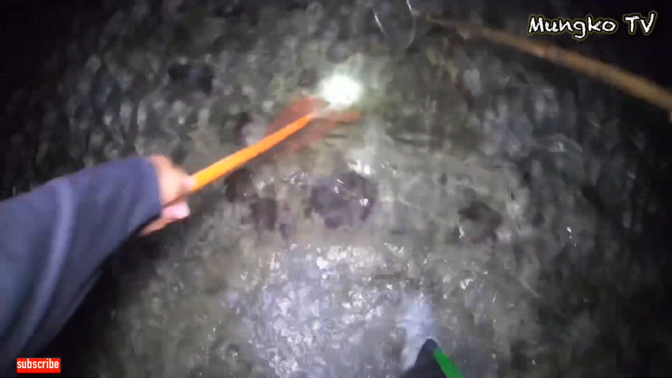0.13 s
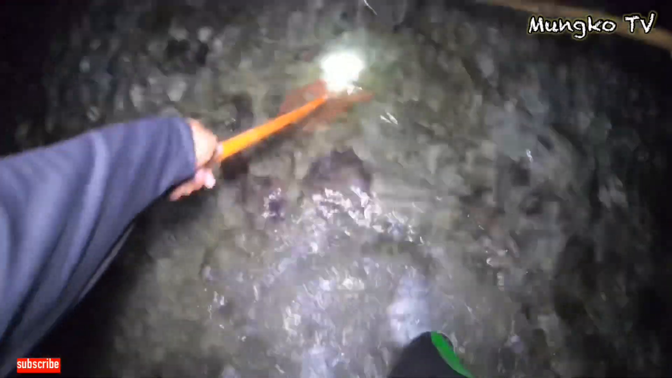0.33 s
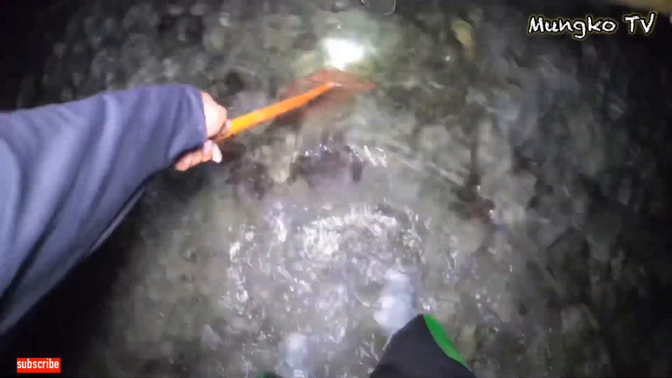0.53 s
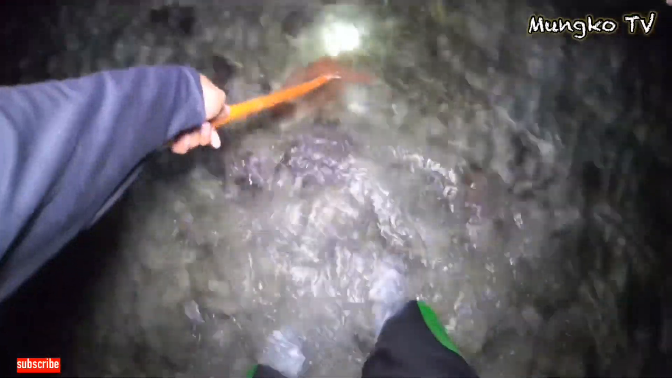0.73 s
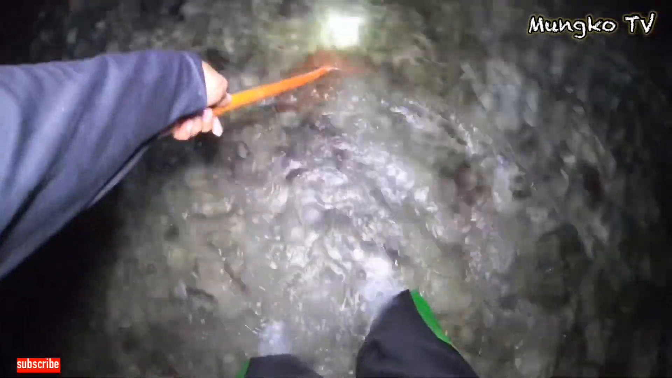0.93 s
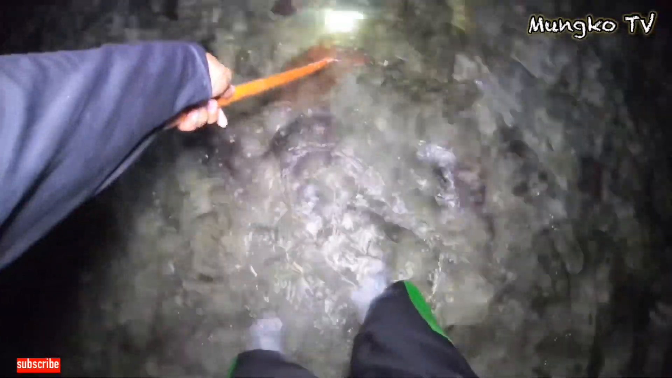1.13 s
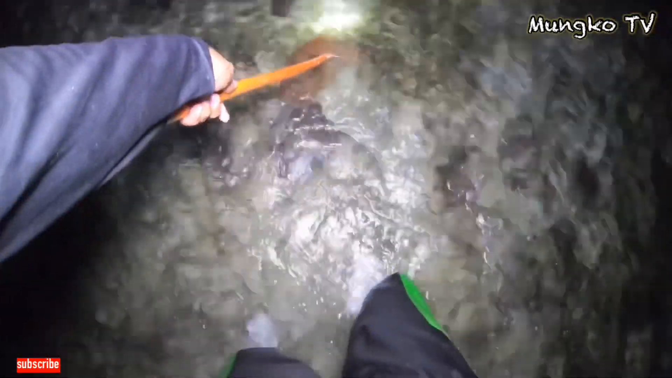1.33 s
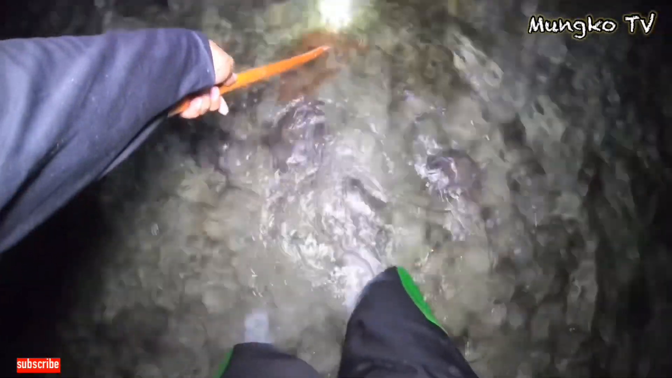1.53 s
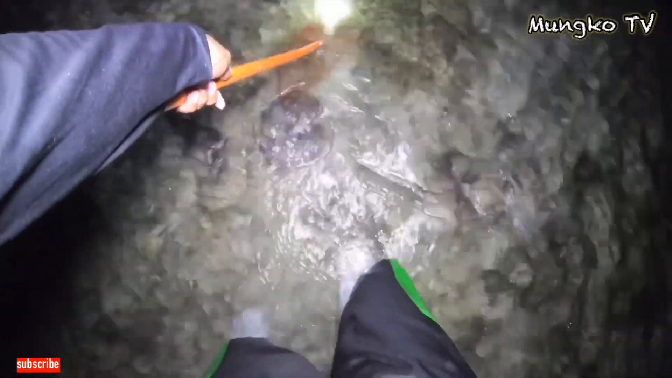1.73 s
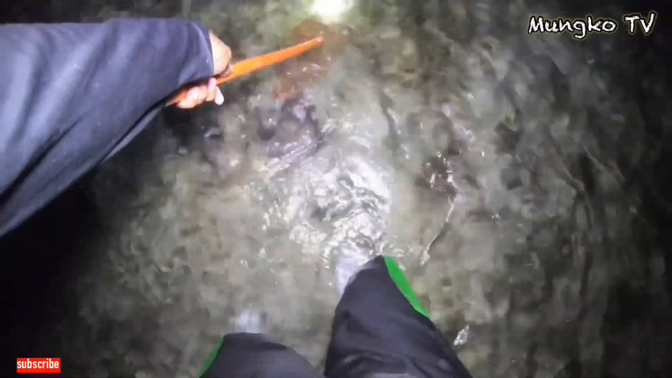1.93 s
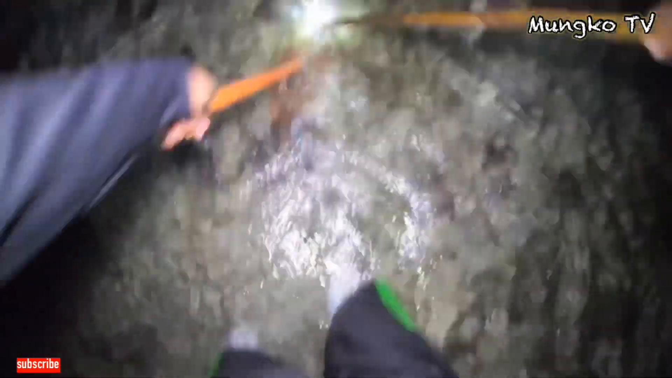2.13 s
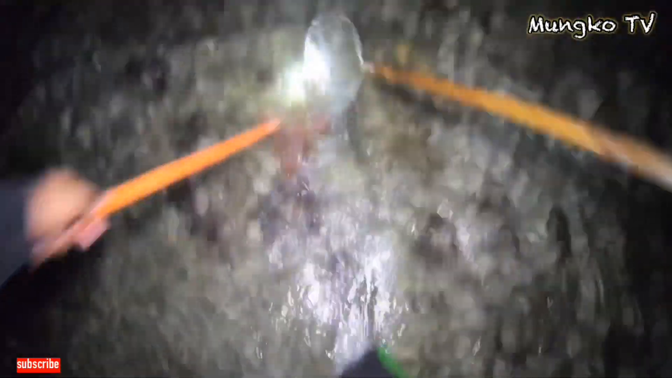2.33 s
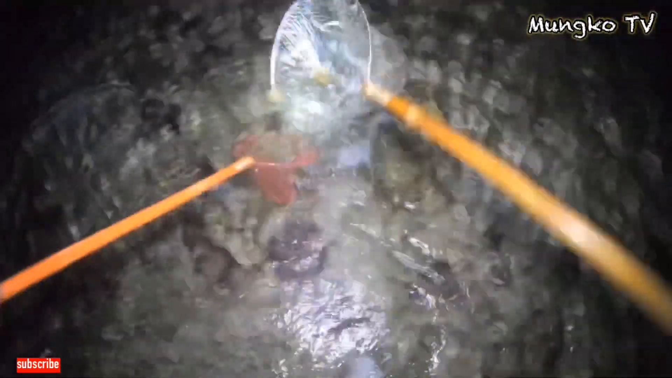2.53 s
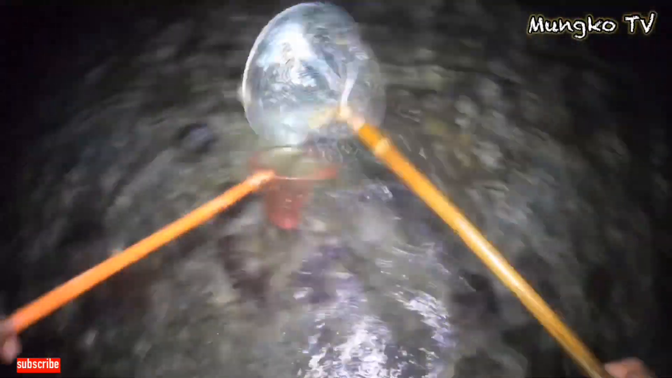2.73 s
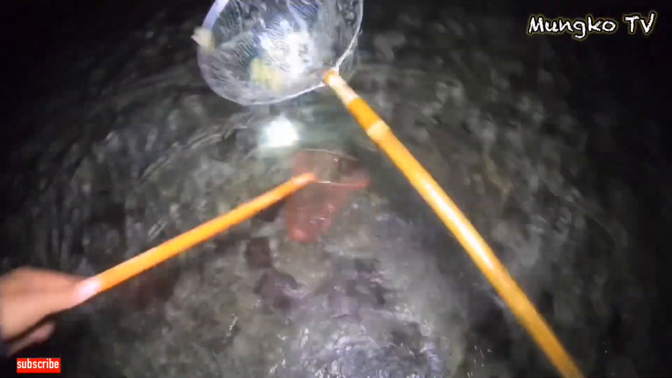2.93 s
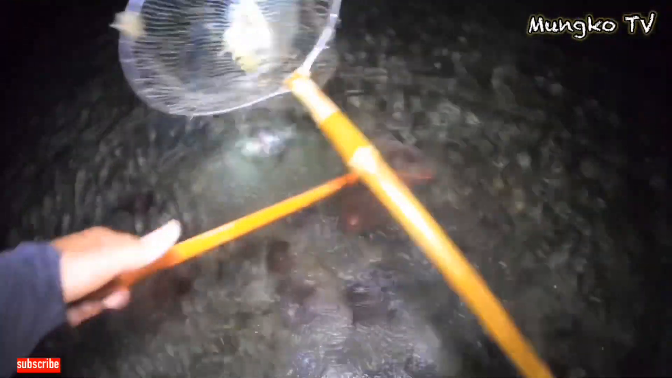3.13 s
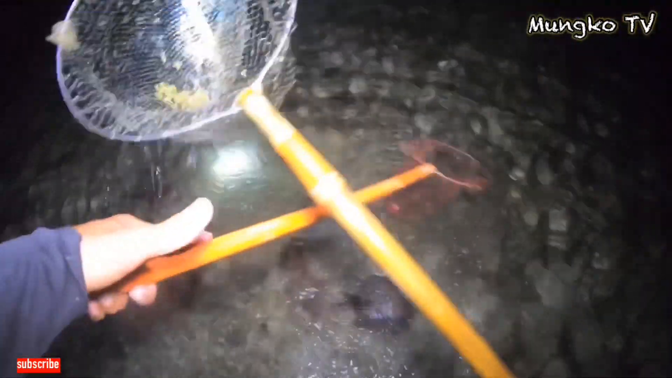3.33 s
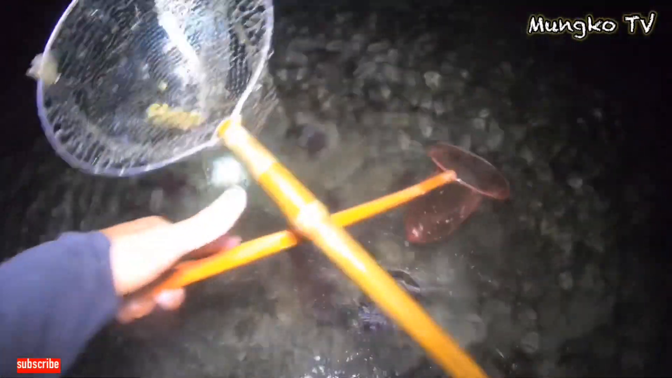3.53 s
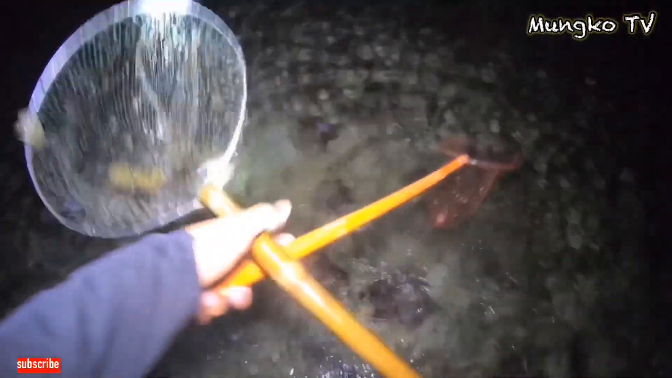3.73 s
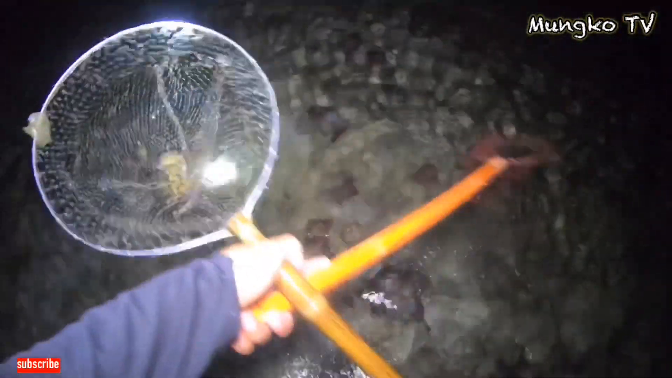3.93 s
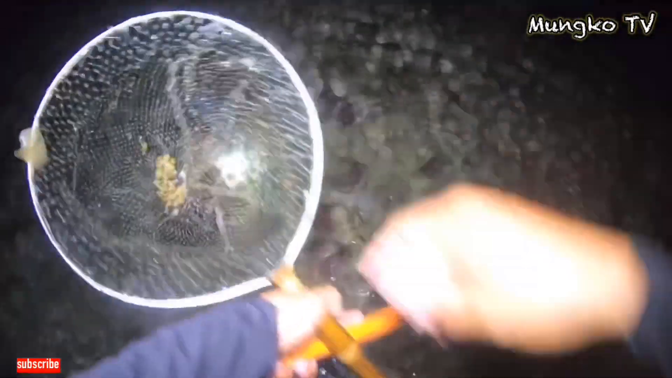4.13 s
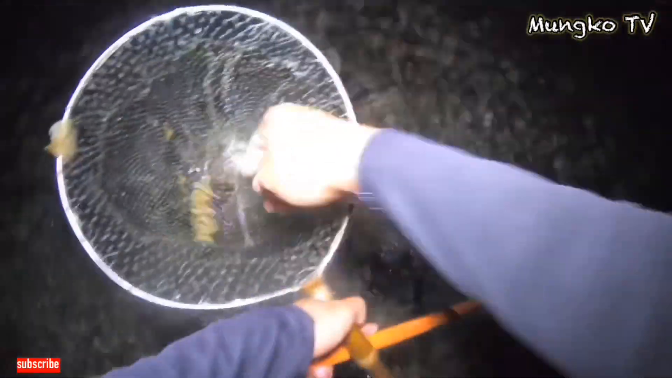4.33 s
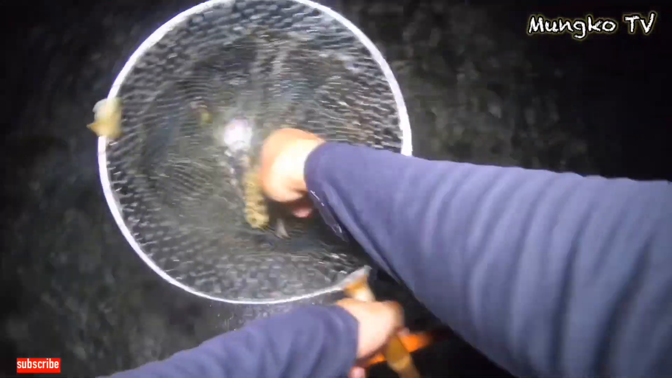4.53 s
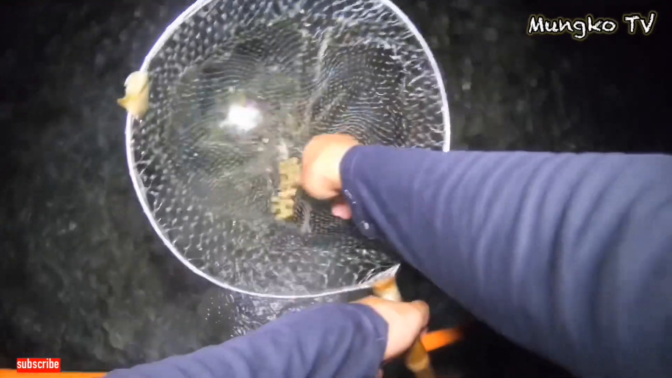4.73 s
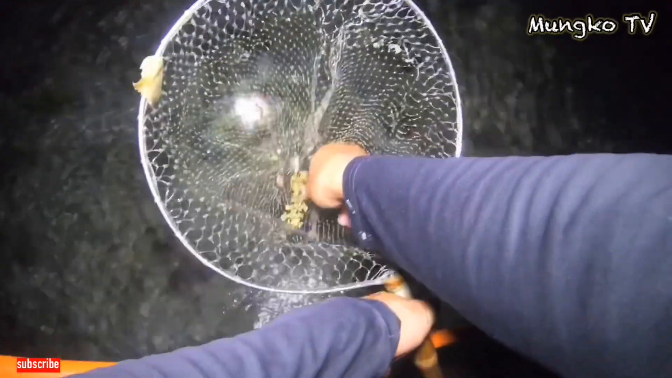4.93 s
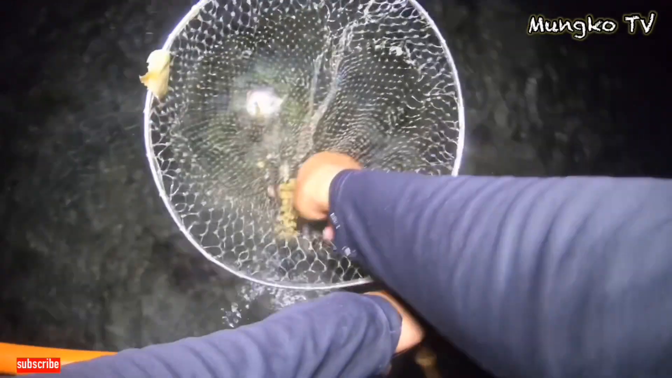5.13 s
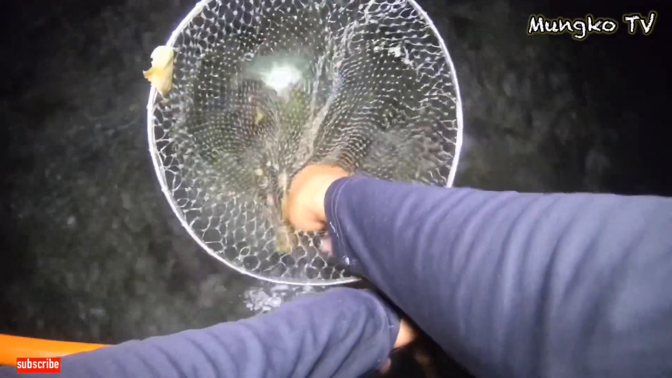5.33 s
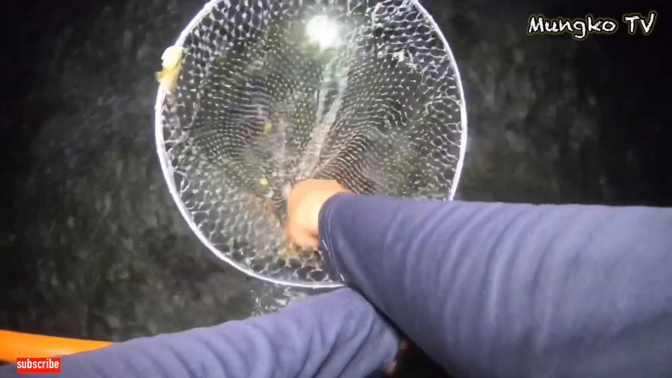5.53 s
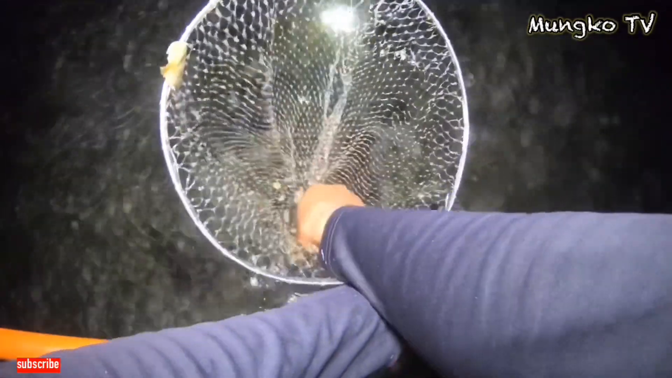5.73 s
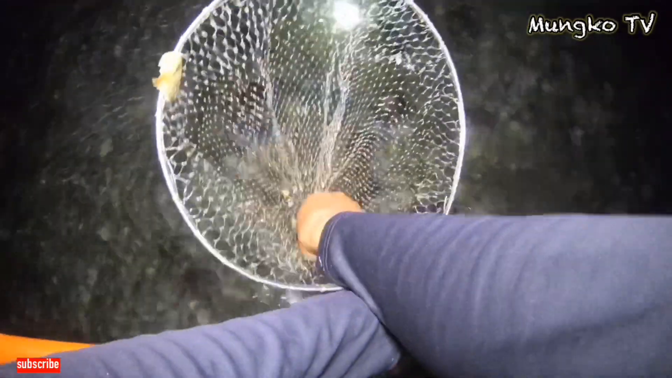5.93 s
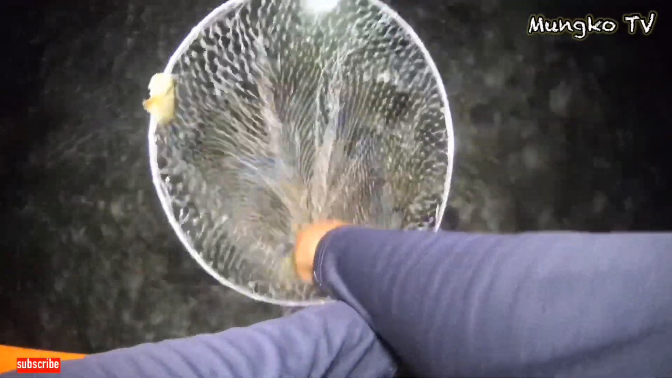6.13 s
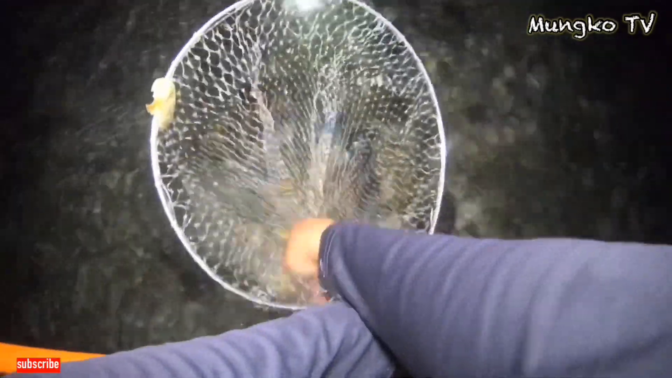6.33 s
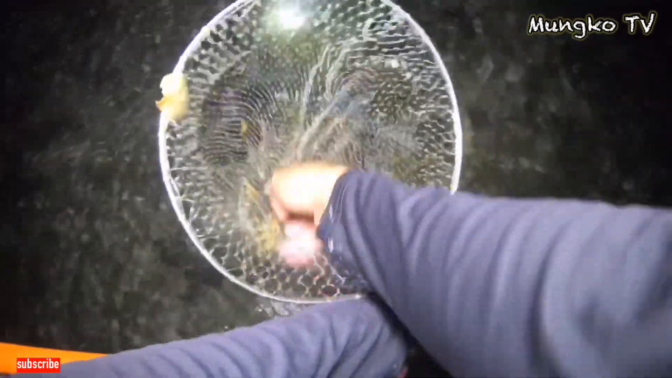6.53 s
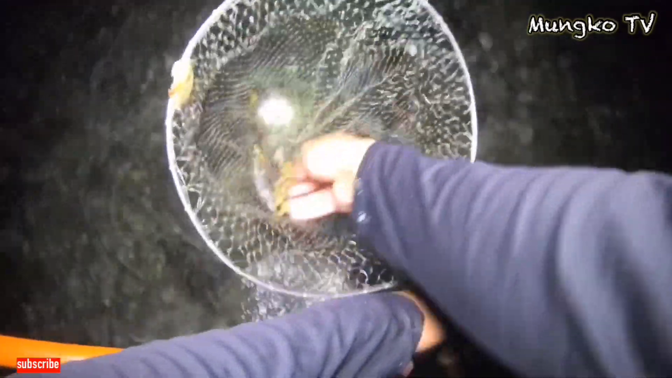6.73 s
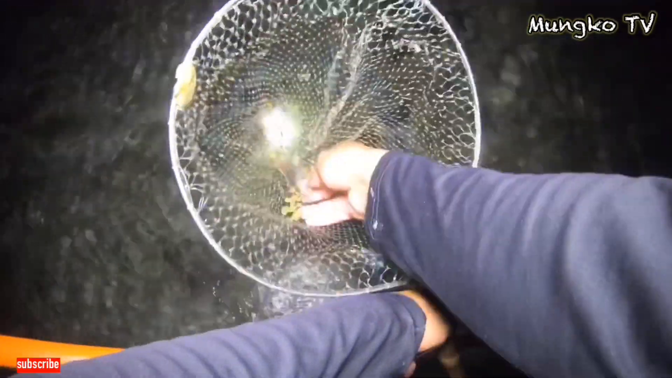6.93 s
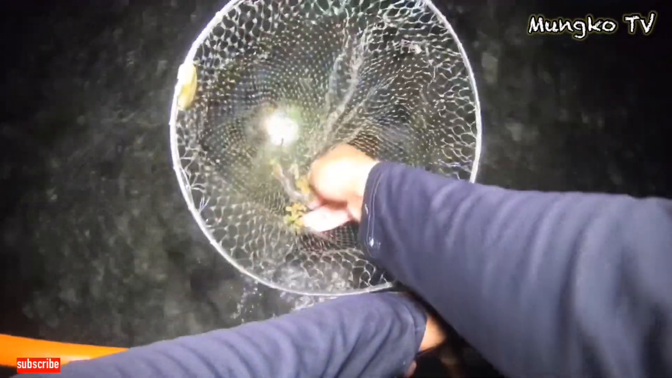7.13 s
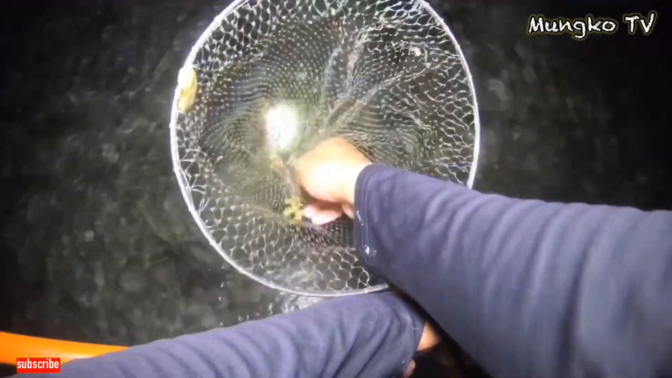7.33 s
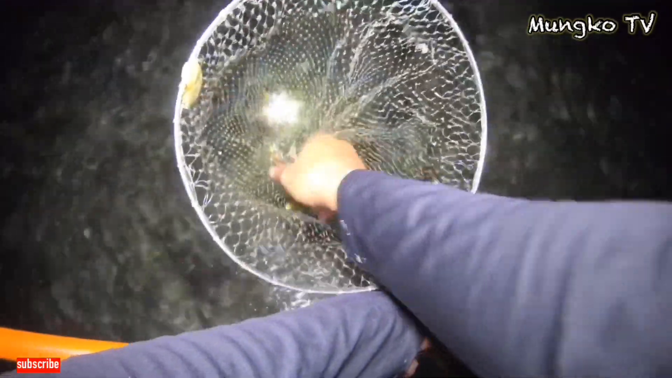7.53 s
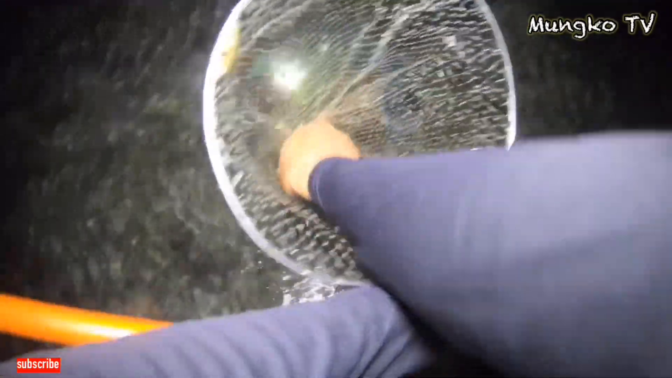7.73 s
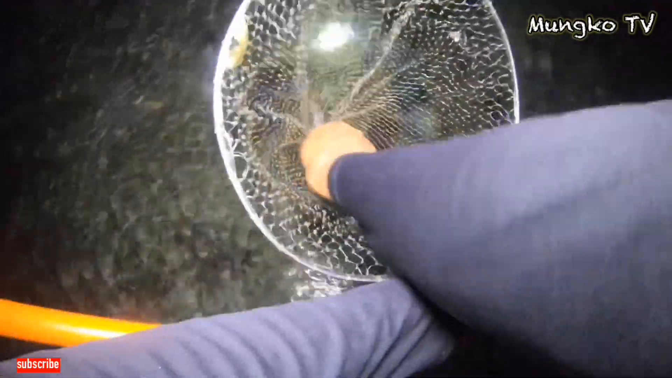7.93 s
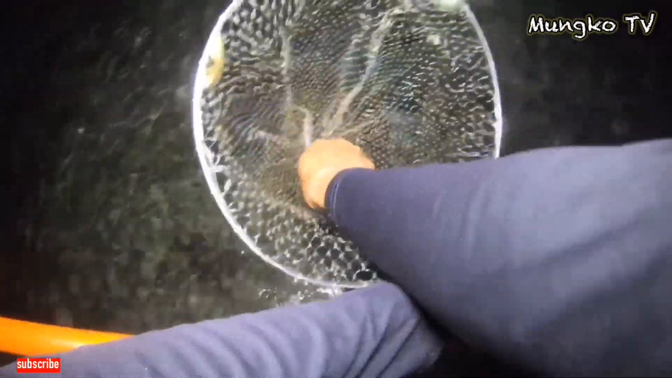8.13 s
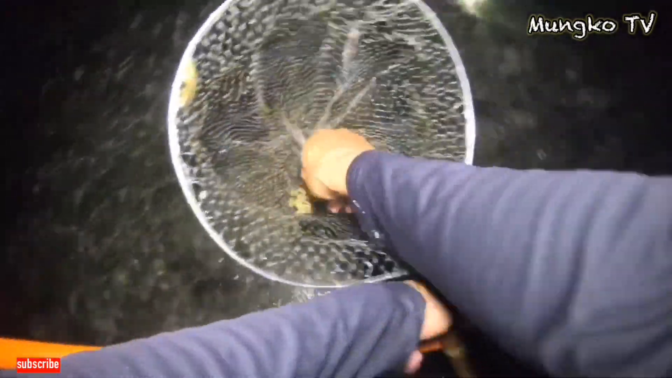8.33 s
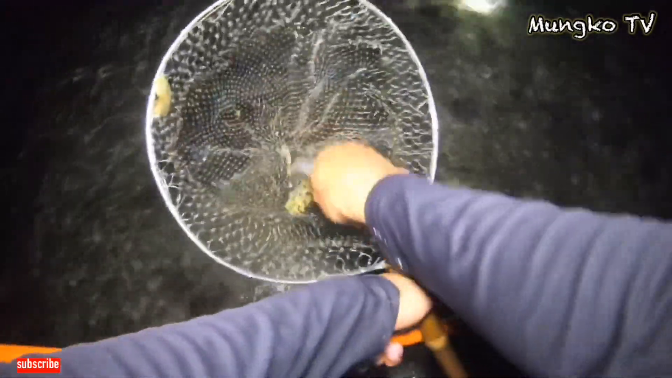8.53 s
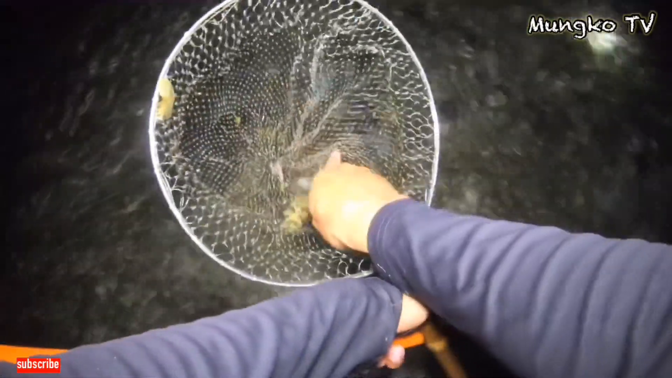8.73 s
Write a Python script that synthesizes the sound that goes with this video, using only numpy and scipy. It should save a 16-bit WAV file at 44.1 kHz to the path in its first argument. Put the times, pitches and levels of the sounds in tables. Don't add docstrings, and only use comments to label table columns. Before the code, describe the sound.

Shallow water splashes and drips as hand nets are swept and lifted, then mesh is fingered softly while wind buffets and bumps knock the microphone.

```python
import sys
import numpy as np
from scipy import signal
from scipy.io import wavfile
from scipy.ndimage import uniform_filter1d

SR = 44100
rng = np.random.default_rng(int(sys.argv[2]) if len(sys.argv) > 2 else 0)


def amp(db):
    return 10 ** (np.asarray(db, float) / 20)


def write(x):
    x = np.atleast_2d(x).T
    wavfile.write(sys.argv[1], SR, np.round(np.clip(x, -1, 1) * 32767).astype(np.int16))


N = 391166

# (time [s], level [dB])
STIRRING = [(0.0, -51), (0.24, -59.5), (0.57, -60.5), (1.31, -67), (1.68, -66), (1.97, -51), (2.81, -54),
            (3.29, -69), (4.2, -57.5), (4.84, -65.5), (5.31, -64), (5.66, -71.5), (6.5, -74), (7.46, -78),
            (7.66, -53), (7.88, -80), (8.42, -67), (8.66, -79)]
# (time [s], droplet share [0-1 or more])
WETNESS = [
    (0, 1.8),
    (.3, 1.1),
    (.55, 0.34),
    (1.5, 0.22),
    (1.6, 1.2),
    (3.05, 1.6),
    (3.2, 0.5),
    (4.5, 0.38),
    (8.87, 0.11),
]
# (frequency [Hz], level [dB per Hz])
SLOSH_TONE = [(300, -8), (500, 1.5), (800, -4.5), (1400, -7), (2000, -12), (3000, -47)]
# (frequency [Hz], level [dB per Hz])
SPLASH_TONE = [(900, -50), (1500, -5.5), (2500, 0.5), (4200, 1.5), (5500, -18), (8000, -30)]
# (frequency [Hz], level [dB per Hz])
SPRAY_TONE = [(3500, -18), (5000, -2), (7000, -8.5), (9500, -10), (11500, -22.5), (13500, -36),
              (14300, -60)]
# (time [s], peak level [dB], ring [Hz])
DROPS = [(0.068, -26.5, 1910), (0.1158, -20, 1670), (0.1845, -30, 2150), (1.5756, -22, 1400),
         (1.754, -31, 4160), (1.8385, -27.5, 1170), (1.8595, -32, 3370), (1.886, -17.5, 3300),
         (1.896, -16, 2550), (2.113, -20.5, 2860), (2.2306, -27, 2780), (2.424, -37, 3550),
         (2.439, -32, 2520), (2.453, -26, 3140), (2.4793, -23, 1710), (2.5177, -24.5, 4520),
         (2.54, -24, 3200), (2.559, -29, 2560), (2.603, -19, 2850), (2.635, -22.5, 1820),
         (2.659, -25, 4000), (2.7576, -31.5, 4330), (2.8923, -21, 4320), (3.0619, -33.5, 1320),
         (3.453, -29, 3430), (4.645, -30, 2100), (5.676, -28, 4800), (5.9, -29.5, 2660),
         (5.9572, -27, 4400), (7.1066, -47, 2680)]
# (time [s], peak level [dB], ring [Hz], relative treble [dB])
MESH_SNAPS = [(2.6875, -31, 2980, -4), (2.731, -28, 3170, -7), (2.813, -36.5, 6150, -21),
              (2.945, -28, 3410, -8), (3.0026, -39, 1750, -20), (3.044, -29, 3000, -9),
              (3.2004, -34.5, 3220, -14), (3.648, -32, 2900, -22), (3.7103, -33.5, 3300, -7),
              (3.9052, -24, 1950, -41), (4.1928, -24, 3480, -22), (4.351, -17, 3800, -31),
              (4.6014, -36.5, 2680, -16), (5.0559, -35.5, 1190, -15), (5.249, -36, 3300, -9),
              (5.335, -37, 3400, -9), (6.035, -33.5, 3300, -16), (6.5784, -26, 3150, -13),
              (6.708, -41, 2680, -10), (6.841, -36, 3350, -18), (6.8943, -31.5, 4160, -2.5),
              (7.2267, -31, 2900, -43), (7.29, -41, 5000, -5), (7.4616, -42, 6170, -4),
              (7.7749, -33, 1980, -15), (7.9746, -38, 3100, -8.5), (8.2654, -33, 5340, -17),
              (8.3916, -32, 2500, -6), (8.4752, -45, 3380, 2), (8.4936, -34, 5430, -7)]
# (frequency [Hz], level [dB per Hz])
CRACK_TONE = [(800, -15), (1500, -3), (3000, 4), (5000, 2), (7000, -30.5), (10000, -54)]
# (frequency [Hz], level [dB per Hz])
TREBLE_TONE = [(4000, -4), (6000, -4.5), (9500, -9.5), (11500, -25), (13000, -31), (15200, -61)]
# (frequency [Hz], level [dB per Hz])
KNOCK_TONE = [(120, -23), (250, -1), (600, 0.5), (1100, -12.5), (2000, -17)]
# (time [s], peak level [dB], start pitch [Hz], end pitch [factor], length [s])
BUBBLES = [(0.069, -34.5, 520, 1.12, 0.029), (0.139, -41, 1250, 1.3, 0.012), (0.178, -37, 520, 0.92, 0.023),
           (0.203, -38, 1570, 1.04, 0.0095), (0.464, -46.5, 1060, 1.9, 0.023),
           (1.58, -42, 800, 1.14, 0.019), (1.569, -33, 1170, 1.1, 0.006), (1.655, -47, 1500, 1.02, .014),
           (1.894, -22, 2510, 1.07, 0.0092), (2.127, -32, 2430, 1.06, 0.0054),
           (2.274, -42, 935, 1.2, 0.013), (2.602, -33.5, 2860, 0.86, 0.021), (2.899, -49, 653, 2.8, 0.058),
           (3.983, -47, 1155, 1.9, 0.03), (3.659, -40.5, 630, 1.56, 0.03), (.04, -38, 870, 1.3, 0.011),
           (0.086, -38, 1600, 1.4, 0.0096), (2.482, -38.5, 1700, 1.2, 0.015),
           (2.547, -41, 800, 0.84, 0.019), (3.905, -31, 1327, 0.97, 0.012), (2.51, -36, 2700, 1.2, .006),
           (2.749, -38, 2900, 1.1, .005), (2.881, -39, 2700, 1.1, .004), (.012, -45, 1700, 1.12, .016),
           (.042, -40, 1700, 1.15, .012), (.069, -42, 1150, .95, .015), (.1, -45, 1600, 1.12, .015),
           (.116, -37, 1300, 1.05, .006), (.153, -44, 1600, 1.15, .014), (.158, -45, 620, 1.5, .045),
           (.215, -46, 1100, 1.27, .03), (.322, -46, 1000, 1.2, .011), (.452, -49, 1500, 1.05, .007),
           (2.036, -41, 1200, 1.05, .006), (2.243, -38, 2550, 1.1, .012), (2.563, -43, 900, 1.1, .007),
           (2.65, -43, 1900, 1.05, .008), (2.793, -46, 1900, 1.1, .009), (2.803, -46, 1000, 1.1, .014),
           (2.928, -45, 1800, 1.05, .006), (3.005, -49, 1250, .95, .012), (3.034, -42, 2300, .9, .009),
           (3.062, -39, 1300, 1.05, .006), (3.268, -44, 1280, 1.05, .005)]
# (time [s], length [s], level [dB], relative hollow part [dB])
RUSTLES = [(0, 0.19, -55, 6.5), (1.403, 0.028, -66, 10.5), (1.568, 0.022, -47.5, 8),
           (1.748, 0.044, -53, -15), (1.859, 0.045, -40.5, -10.5), (2.173, 0.11, -47.5, -15),
           (3.034, 0.021, -49, -17), (3.899, .012, -48.5, 8), (4.303, 0.059, -54.5, 3),
           (4.593, 0.03, -48.5, -4.5), (4.687, 0.03, -55, 7), (4.705, .03, -51, -3),
           (4.766, 0.018, -53, -1), (4.838, 0.06, -53, 4), (5.664, .014, -58, -8), (5.886, .017, -55, -5),
           (5.948, .018, -56, -8), (6.0, .05, -62, -5), (6.56, 0.02, -56, 4), (6.576, .016, -43, 1),
           (6.626, 0.012, -52, 1), (6.67, 0.012, -51, 0), (6.705, 0.036, -49, -4.5),
           (6.84, 0.065, -49.5, -4), (6.937, 0.034, -62, -13), (7.172, 0.025, -61, 2),
           (7.222, 0.035, -50, -3), (7.59, 0.1, -62, -4), (7.962, 0.033, -57.5, -7.5),
           (8.09, 0.075, -62, 4), (8.26, 0.026, -64.5, 9.5)]
# (frequency [Hz], level [dB per Hz])
RUSTLE_TONE = [(900, -26), (1500, -2), (3000, 4.5), (5000, -4), (7000, -19), (10500, -22), (12500, -36),
               (14500, -58)]
# (time [s], peak level [dB], pitch [Hz])
DRIPS = [(0.1446, -38, 3160), (0.1744, -34, 2220), (0.2568, -41, 3350), (0.2972, -43, 3220),
         (0.3431, -43, 3090), (1.948, -34, 3430), (2.0344, -38, 2970), (2.1794, -33, 2720),
         (2.2644, -34, 2290), (2.2922, -34, 2610), (2.3094, -36, 3600), (2.3635, -36, 2930),
         (2.3794, -37, 2780), (2.5764, -37, 2490), (2.6084, -25, 2630), (2.6379, -25, 4030),
         (2.6654, -26, 2690), (2.7044, -37, 3100), (2.7754, -36, 3280), (2.8214, -37, 4580),
         (2.8409, -30, 3530), (2.8554, -38, 4350), (2.8654, -37, 2860), (2.9094, -31, 4160),
         (2.9224, -27, 4460), (2.9647, -38, 3950), (2.9704, -38, 5130), (2.9834, -42, 2770),
         (3.0086, -36, 4470), (3.0759, -39, 3230), (3.1228, -44, 2790), (3.1572, -39, 2920),
         (3.2244, -48, 3390), (3.2919, -42, 4220), (3.3348, -50, 2640), (3.3443, -48, 3570),
         (3.3667, -48, 3560), (3.478, -49, 3180), (3.5793, -44, 4110), (3.6311, -39, 3070),
         (3.7564, -48, 4080)]
# (time [s], peak level [dB], pitch [Hz])
PICKS = [(4.9676, -48, 2750), (5.026, -48, 9980), (5.0365, -41, 3880), (5.0739, -39, 3170),
         (5.0864, -42, 3520), (5.0963, -42, 4270), (5.1322, -44, 3120), (5.1901, -39, 3520),
         (5.2004, -44, 3240), (5.2709, -47, 4270), (5.2989, -46, 4850), (5.3444, -42, 4310),
         (5.3697, -46, 4390), (5.3921, -43, 3510), (5.4044, -48, 2800), (5.4385, -47, 4370),
         (5.4944, -48, 2950), (5.5209, -48, 3800), (5.5777, -44, 4090), (5.9579, -31, 4480),
         (6.0043, -45, 3780), (6.0434, -45, 3500), (6.0641, -49, 3700), (6.7381, -32, 2940),
         (7.6021, -41, 2750), (7.6354, -41, 3080), (7.662, -35, 5250), (7.6754, -43, 5160),
         (7.8221, -49, 2600), (8.1044, -51, 3810), (8.1459, -48, 3450), (8.1673, -45, 5230),
         (8.5144, -54, 5250)]
# (frequency [Hz], level [dB per Hz])
STRAND_TONE = [(1500, -16), (3500, 0), (6500, -8), (9000, -4), (11000, -16), (14000, -30), (15300, -55)]
# (time [s], peak level [dB],
# ring [Hz], t60 [s])
TAPS = [(3.14, -50, 816, .025), (3.224, -39, 600, .02), (3.28, -46, 715, .04), (3.383, -52, 800, .025),
        (3.426, -50, 720, .035), (3.657, -39, 740, .03), (5.884, -44, 840, .06), (6.586, -25, 511, .1),
        (6.588, -38, 996, .12), (6.841, -40, 643, .05), (6.868, -32, 790, .12), (7.508, -54, 703, .08),
        (7.553, -52, 713, .08), (7.605, -42, 694, .06), (7.712, -38, 330, .06), (7.775, -43, 703, .06),
        (7.823, -48, 692, .07), (7.972, -50, 783, .09), (7.228, -36, 800, .09), (7.188, -43, 610, .07),
        (8.124, -48, 794, .05), (8.147, -48, 775, .06), (8.265, -45, 681, .07), (8.285, -36, 285, .14),
        (8.09, -40, 300, .1)]
# (time [s], peak level [dB], thud [Hz])
BUMPS = [(0.746, -20.5, 126), (0.88, -23, 133), (1.378, -23.5, 160), (1.553, -26, 180), (1.902, -18, 200),
         (2.065, -17.5, 200), (2.109, -20, 260), (3.484, -28.5, 159), (3.904, -30.5, 275),
         (4.219, -24.5, 130), (4.6, -23, 177), (4.687, -19, 153), (4.726, -16.5, 244), (4.983, -34, 167),
         (5.07, -19, 198), (5.393, -23, 208), (6.572, -14, 150), (6.583, -11.5, 300), (6.665, -22.5, 131),
         (6.711, -16.5, 164), (6.869, -18, 130), (6.882, -14.5, 290), (7.19, -27, 132), (7.229, -26, 164),
         (8.257, -30.5, 134)]
# (frequency [Hz], level [dB], t60 [s])
MOUNT_MODES = [(275, -6, .06), (350, -2.5, 0.065), (511, -6, 0.09), (593, -8, 0.09), (800, -9, 0.075),
               (1025, -15, 0.06)]
# (frequency [Hz], width [Hz], level [dB])
HOUSING_MODES = [(520, 70, -5.5), (695.7, 50, 6), (800, 27, 2)]
# (time [s], level [dB])
STRAP_RUB = [
    (4.55, -80),
    (4.6, -68),
    (4.9, -55),
    (5.0, -69),
    (5.1, -58),
    (5.4, -56.5),
    (5.6, -70),
    (5.7, -90),
]
# (time [s], level [dB], share of small eddies [dB])
GUSTS = [(0.0, -40, -8.5), (0.94, -31.5, -8.5), (1.25, -35, -12.5), (2.25, -35, -8.5), (3.34, -43.5, -13),
         (3.55, -40.5, 8.5), (4.15, -59, 2), (4.42, -41.5, -1.5), (4.59, -67.5, 15.5), (4.73, -43, 6.5),
         (5.06, -38.5, -1.5), (5.61, -53.5, 4), (6.5, -55.5, 3), (6.66, -37.5, -3.5), (7.49, -48.5, -5.5),
         (8.1, -41.5, -4), (8.33, -48.5, -4.5), (8.57, -69, 13)]
# (time [s], peak level [dB], length [s])
PUFFS = [
    (3.381, -37, 0.02),
    (4.22, -35, 0.042),
    (5.97, -44, 0.15),
    (6.61, -33, .03),
    (6.855, -30, 0.066),
    (7.224, -38, 0.069),
    (7.564, -38.5, 0.081),
    (8.263, -37.5, 0.088),
    (8.819, -30.5, 0.059),
]
# (time [s], left-right difference [dB])
GUST_PAN = [
    (8.1, -11),
    (8.6, 1),
    (8.81, 17),
    (8.87, 4),
]
# (frequency [Hz], level [dB per Hz])
WIND_DEEP_TONE = [(14, -25.5), (25, -3.5), (45, -0.5), (62, -11.5), (100, -44)]
# (frequency [Hz], level [dB per Hz])
WIND_LOW_TONE = [(35, -28.5), (58, 0), (90, 0.5), (120, -2.5), (155, -19.5), (250, -54)]
# (frequency [Hz], level [dB per Hz])
WIND_UPPER_TONE = [(90, -25), (140, 5), (220, -2.5), (350, -15), (600, -36.5), (1200, -55.5)]
# (time [s], stereo width [0-1])
STEREO_OPENS = [
    (6.45, 0),
    (6.62, .3),
    (6.78, 1),
]
PORT_LIKENESS = 0.1, 0.1, 0.45
# (frequency [Hz], width [Hz], share lost [negative lifts])
PORT_DIPS = [(9100, 600, .4), (10400, 500, .5), (11050, 700, -.7), (12150, 600, .45), (12950, 600, -.8),
             (14100, 1700, .75)]


def evened(x):
    return x / np.sqrt(np.mean(x ** 2) + 1e-20)


def curve(rows):
    s, *columns = np.transpose(rows)
    return [np.interp(np.arange(N) / SR, s, column) for column in columns]


def colour(x, points):
    f, level_db = np.transpose(points)
    hz = abs(np.fft.fftfreq(8192, 1 / SR))
    gain_db = np.interp(np.log(hz + 1), np.log(f), level_db, left=-70, right=-90)
    log_gain = gain_db * np.log(10) / 20
    minimum_phase = np.exp(np.conj(signal.hilbert(log_gain)))
    kernel = np.fft.ifft(minimum_phase).real[:4096]
    kernel = (kernel / np.linalg.norm(kernel))[(None,) * (x.ndim - 1)]
    return signal.oaconvolve(x, kernel, axes=-1)[..., :x.shape[-1]]


def flicker(seconds):
    size = max(int(seconds * SR), 2)
    smooth = uniform_filter1d(rng.standard_normal(N), size)
    return evened(uniform_filter1d(smooth, size))


def ports(pair, same, pan_db=0):
    width, = curve(STEREO_OPENS)
    like = 1 - width * (1 - same)
    right = like * pair[0] + np.sqrt(1 - like ** 2) * pair[1]
    tilt = amp(width * pan_db / 2)
    return np.array([pair[0] * tilt, right / tilt])


def resonate(x, hz, width):
    return signal.lfilter(*signal.iirpeak(hz, hz / width, SR), x)


def add(mix, s, sound):
    part = mix[..., round(s * SR):][..., :sound.shape[-1]]
    part += sound[..., :part.shape[-1]]


def droplets(low_hz, high_hz, cycles, spread_db, count):
    when, pitch, size, glide = rng.random((count, 4), dtype=np.float32).T[..., None]
    steps = np.arange(int(1.5 * cycles * SR / low_hz))
    hz = low_hz * (high_hz / low_hz) ** pitch
    turns = steps.astype(np.float32) * hz / SR
    bend = 1 + (0.0121 * glide - .004) * turns
    rings = np.sin(2 * np.pi * turns * bend) * np.exp(-turns / cycles) * np.minimum(turns, 1)
    rings *= np.sqrt(hz) * amp(spread_db * np.minimum(-np.log(1 - size + 1e-6), 5))
    places = (when * N).astype(int) + steps
    return evened(np.bincount(places.ravel(), rings.ravel(), N)[:N])


def water():
    (splash_db,), (wet,), (width,) = curve(STIRRING), curve(WETNESS), curve(STEREO_OPENS)
    effort_db = splash_db + 64.5
    hollow_db = -64.5 + 0.57 * effort_db
    spray_db = -70 + 0.7 * effort_db + 5 * width
    flurry = amp(1.9 * (0.89 * flicker(0.003) + flicker(0.025)))
    hiss = rng.standard_normal((3, 2, N))
    hollow = evened(colour(hiss[0], SLOSH_TONE)) + wet * 0.46 * droplets(525, 1890, 3.6, 7.8, count=1200)
    splash = evened(colour(hiss[1], SPLASH_TONE)) + wet * 0.95 * droplets(1900, 4700, 9.5, 3.6, count=4500)
    spray = evened(colour(hiss[2], SPRAY_TONE)) + wet * 0.36 * droplets(4950, 8600, 4.5, 4.6, count=7000)
    body = (amp(splash_db) * splash + amp(hollow_db) * hollow) * flurry
    mist = amp(spray_db) * spray * flurry
    return ports(body, PORT_LIKENESS[1]) + ports(mist, PORT_LIKENESS[1], pan_db=-6)


def snaps(ring_width=0.033, rise_s=0.00042, t60_s=0.024):
    t, out = np.arange(2500) / SR, np.zeros((2, N))
    rows = [(*row, -26, -25) for row in DROPS]
    rows += [(*row, -9.5) for row in MESH_SNAPS]
    bright, dull = np.moveaxis(rng.standard_normal((len(rows), 2, 2, len(t))), 1, 0)
    long, glide = rng.random((len(rows), 2)).T[..., None, None]
    s, peak_db, hz, top_db, low_db = np.transpose(rows)[..., None, None]
    low_db = low_db - 5.5 * np.log2(hz / 2800)
    wet = np.interp(s, *np.transpose(WETNESS))

    decay = amp(-60 * t / (t60_s * (.5 + 1.15 * long) * (.55 + .3 * wet)))
    sting = 1 + 1.2 * np.exp(-t / .0013)
    fade = decay * (1 - np.exp(-t / rise_s)) * sting
    burst_power = ((bright * fade) ** 2).sum(-1, keepdims=True)
    bright = bright * np.sqrt((fade ** 2).sum(-1, keepdims=True) / burst_power)

    ring = 0.8 * np.array([evened(resonate(b, f, ring_width * f)) for b, f in zip(bright, hz.ravel())])
    pure = 0.45 * wet * np.sin(2 * np.pi * hz * t * (1 + 9 * (glide - .3) * t))
    crack = colour(bright * fade, CRACK_TONE) + (ring + pure) * fade ** 0.7
    top = amp(top_db + 5.5) * colour(bright * fade ** 0.84, TREBLE_TONE)
    knock = amp(low_db + 3.5) * colour(dull * fade ** 0.49, KNOCK_TONE)
    for start, sound in zip(s.ravel(), amp(peak_db - 11.5) * (crack + top + knock)):
        add(out, start - .0005, sound)
    return ports(out, PORT_LIKENESS[2])


def bubbles():
    out = np.zeros(N)
    for s, peak_db, hz, rise, length in BUBBLES:
        u = np.arange(0, 1.3, 1 / (length * SR))
        phase = 2 * np.pi * np.cumsum(hz * rise ** (u ** 1.9)) / SR
        swell = (1 - np.exp(-u / 0.018)) * np.exp(-1.8 * u ** 2)
        add(out, s, amp(peak_db) * np.sin(phase) * swell)
    return out


def housing(scrape):
    modes = [amp(db) * resonate(resonate(scrape, hz, w), hz, 2 * w) for hz, w, db in HOUSING_MODES]
    return evened(sum(modes))


def rustles(tail_s=0.014, rise_share=0.18, sag_db=3.0):
    t, level, hollow_level = np.arange(N) / SR, np.zeros(N), np.zeros(N)
    wet = np.clip(curve(WETNESS)[0], 0, 1)
    for s, length, db, hollow_db in RUSTLES:
        near = slice(int(s * SR), int((s + length + .15) * SR))
        age = t[near] - s
        shape = amp(db + sag_db * (.5 - np.clip(age / length, 0, 1)))
        shape *= np.clip(age / (rise_share * length), 0, 1)
        shape *= np.exp(-np.maximum(age - length, 0) / tail_s)
        level[near] += shape
        hollow_level[near] += amp(hollow_db) * shape
    scrape = rng.standard_normal((2, 2, N)) * amp(3.6 * flicker(0.0031))
    fizz = 0.9 * wet * droplets(1530, 4470, 6.0, 4.0, count=4000)
    scratch = evened(colour(scrape[0], RUSTLE_TONE)) + fizz
    slosh = (1 - 0.3 * (1 - wet)) * evened(colour(scrape[1], SLOSH_TONE))
    gurgle = 1.5 * wet * droplets(607, 1874, 9.5, 3.3, count=1600)
    hollow = slosh + gurgle + 1.2 * (1 - wet) * housing(scrape[1])
    return ports(scratch * level + hollow * hollow_level, PORT_LIKENESS[2])


def ticks(rows, lift_db, t60_s, sharpness, wide):
    t, out = np.arange(500) / SR, np.zeros((2, N))
    fade = amp(-60 * t / t60_s) * (1 - np.exp(-t / .0003))
    bursts = rng.standard_normal((len(rows), 2, len(t))) * fade
    for (s, peak_db, hz), burst, click in zip(rows, bursts, colour(bursts, STRAND_TONE)):
        ring = resonate(resonate(burst, hz, hz / sharpness), hz, hz / 2)
        tick = evened(ring) + wide * evened(click)
        add(out, s - .0005, amp(peak_db + lift_db) * tick / abs(tick).max())
    return ports(out, PORT_LIKENESS[2])


def drips():
    return ticks(DRIPS, lift_db=-2.5, t60_s=.015, sharpness=6.0, wide=.3)


def mesh_picks():
    return ticks(PICKS, lift_db=-.7, t60_s=.01, sharpness=2.5, wide=1.2)


def taps(lift_db=-1.5, rise_s=.0015):
    t, out = np.arange(6000) / SR, np.zeros(N)
    for s, peak_db, hz, t60 in TAPS:
        fade = amp(peak_db + lift_db - 60 * t / t60) * (1 - np.exp(-t / rise_s))
        add(out, s - .001, fade * np.sin(2 * np.pi * hz * t))
    return out


def bumps(thud_cycles=15.0, rise_s=0.002):
    t, out = np.arange(8000) / SR, np.zeros(N)
    luck = rng.standard_normal((len(BUMPS), len(MOUNT_MODES), 2))
    for (s, peak_db, hz), shake in zip(BUMPS, luck):
        thud = np.sin(2 * np.pi * hz * t) * amp(-60 * t * hz / thud_cycles)
        rings = np.zeros(len(t))
        for (f, db, t60), (louder, sharper) in zip(MOUNT_MODES, shake):
            fade = amp(db + 2.5 * louder - 60 * t / t60)
            rings += fade * np.sin(2 * np.pi * f * (1 + 0.021 * sharper) * t)
        rings *= amp(-7.5 + .3 * (peak_db + 20)) / abs(rings).max()
        add(out, s, amp(peak_db - 4.5) * (thud + rings) * (1 - np.exp(-t / rise_s)))
    return out


def strap():
    scrape = rng.standard_normal((2, N)) * amp(4.5 * flicker(0.0085))
    body = .55 * evened(colour(scrape, SLOSH_TONE + CRACK_TONE[-2:]))
    fine = .22 * evened(colour(scrape, STRAND_TONE))
    return ports((housing(scrape) + body + fine) * amp(curve(STRAP_RUB)[0]), PORT_LIKENESS[1])


def wind(skew=0.12):
    (breeze_db, small_db), (pan_db,), t = curve(GUSTS), curve(GUST_PAN), np.arange(N) / SR
    puff = sum(amp(db - 8.7 * np.minimum(abs(t - s) / length, 9) ** 1.22) for s, db, length in PUFFS)
    breeze = amp(breeze_db)
    lumps, air = flicker(0.029), rng.standard_normal((2, 2, N))
    deep = evened(colour(air[0], WIND_DEEP_TONE) * amp(0.59 * lumps))
    low = evened(colour(air[0], WIND_LOW_TONE) * amp(3.0 * lumps))
    low = evened(low + skew * (low ** 2 - uniform_filter1d(low ** 2, 1500, axis=1)))
    upper_lumps = 0.53 * lumps + 0.81 * flicker(0.019)
    upper = evened(colour(air[1], WIND_UPPER_TONE) * amp(5.0 * upper_lumps))
    push = low * np.hypot(breeze, puff)
    push = push + deep * np.hypot(amp(-3.0) * breeze, amp(-6.5) * puff)
    push = push + upper * np.hypot(amp(small_db) * breeze, amp(-10) * puff)
    pan_makeup = 2 / (amp(pan_db / 2) + amp(-pan_db / 2)) ** 0.81
    return ports(push, PORT_LIKENESS[0], pan_db) * pan_makeup


def scene():
    wet_action = water() + snaps() + bubbles() + rustles() + drips() + mesh_picks()
    return wet_action + taps() + bumps() + strap() + wind()


def band_limit(x):
    return signal.sosfilt(signal.butter(12, 15320, fs=SR, output="sos"), x)


def record(dry):
    width, = curve(STEREO_OPENS)
    for dip_hz, dip_width_hz, loss in PORT_DIPS:
        dry = dry - loss * (1 - width) * resonate(dry, dip_hz, dip_width_hz)
    dry = dry + amp(-89) * width * rng.standard_normal(dry.shape)
    apart = .55 * resonate((dry[0] - dry[1]) / 2, 3000, 2500)
    whistle = .8 * width * resonate(dry[1], 5500, 1800)
    pair = [dry[0] - apart, dry[1] + apart + whistle]
    limited = signal.oaconvolve(pair, signal.firwin(255, 14900, fs=SR)[None], "same")
    return band_limit(limited)


dry = scene()
out = record(dry)
write(out)
```